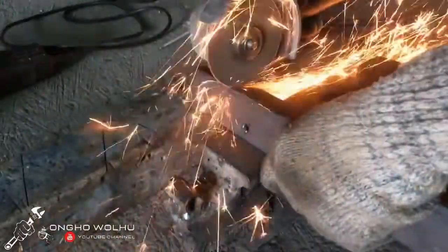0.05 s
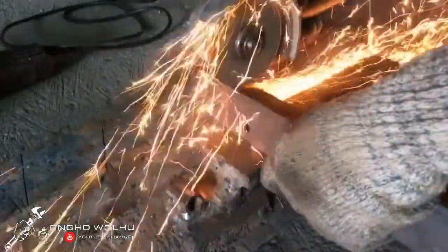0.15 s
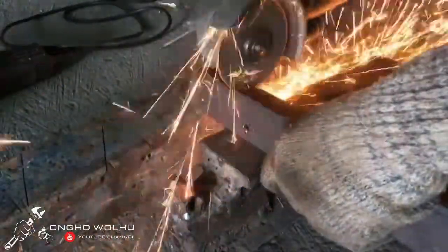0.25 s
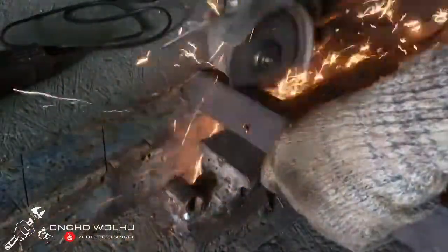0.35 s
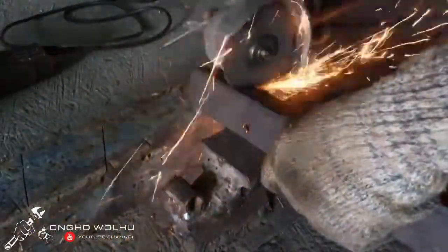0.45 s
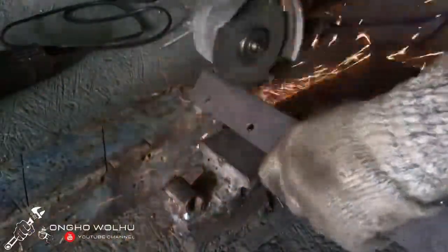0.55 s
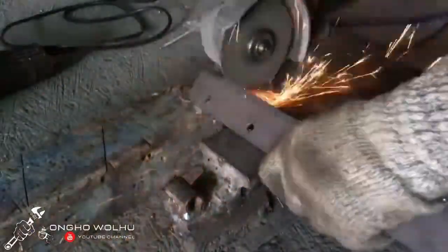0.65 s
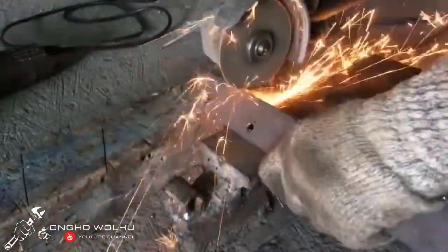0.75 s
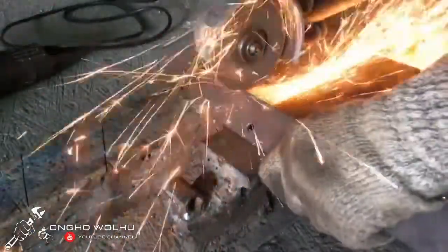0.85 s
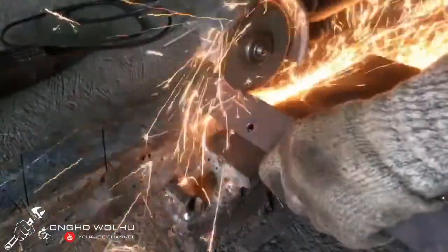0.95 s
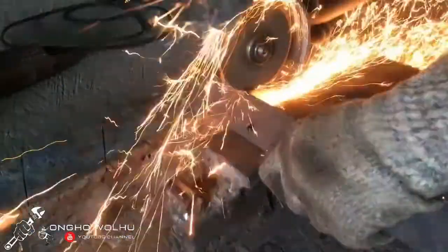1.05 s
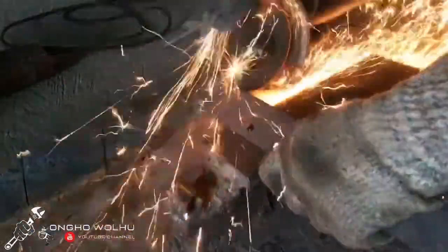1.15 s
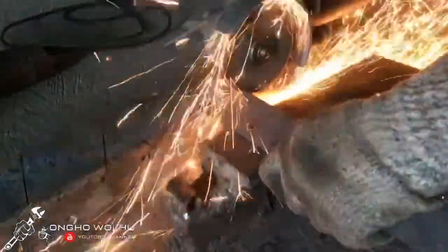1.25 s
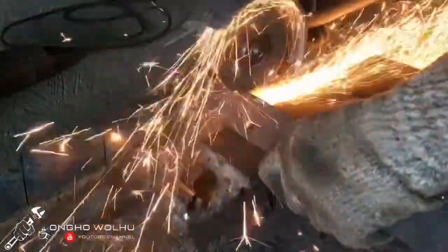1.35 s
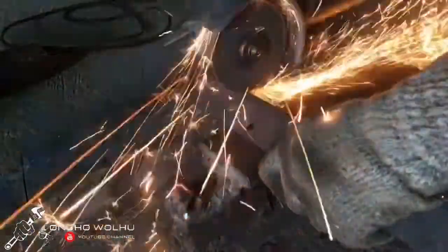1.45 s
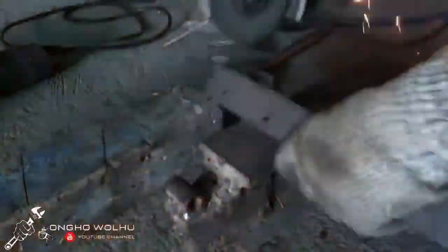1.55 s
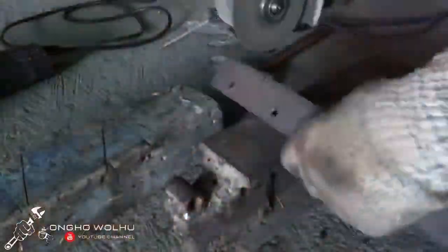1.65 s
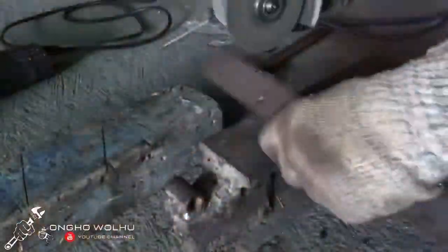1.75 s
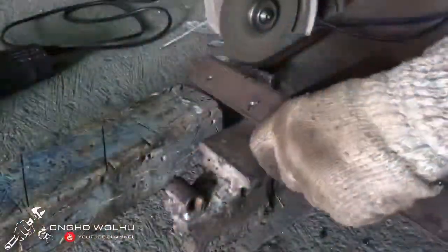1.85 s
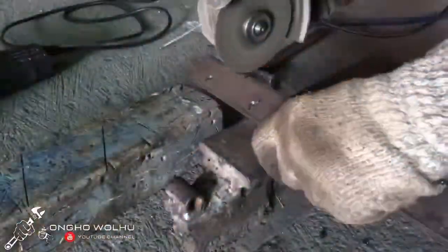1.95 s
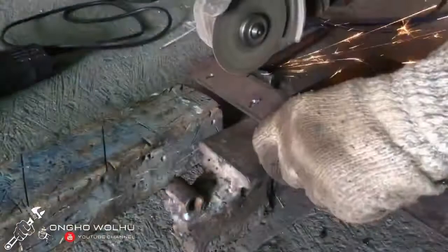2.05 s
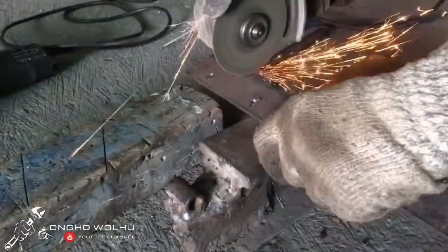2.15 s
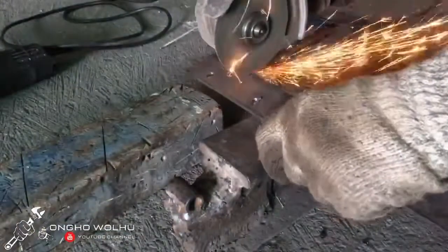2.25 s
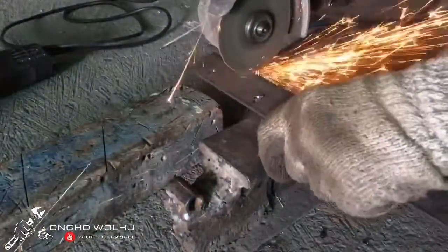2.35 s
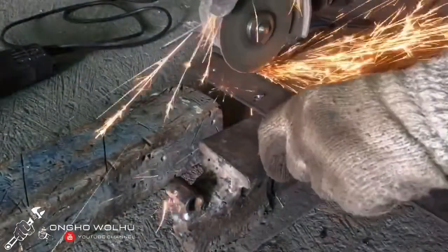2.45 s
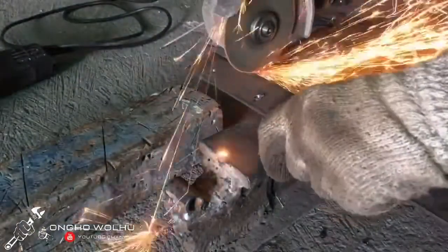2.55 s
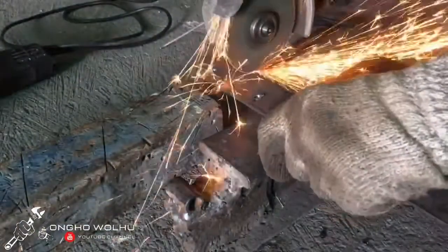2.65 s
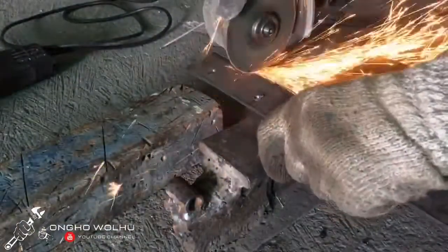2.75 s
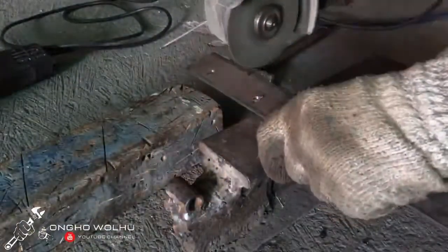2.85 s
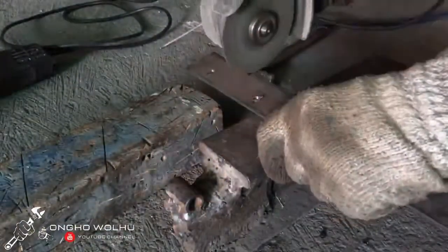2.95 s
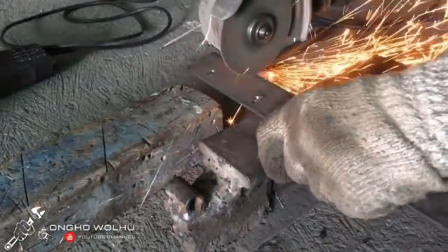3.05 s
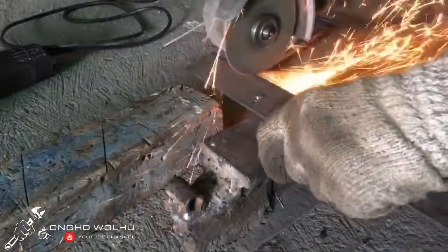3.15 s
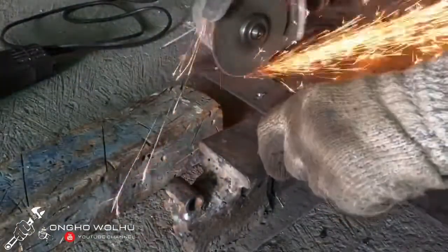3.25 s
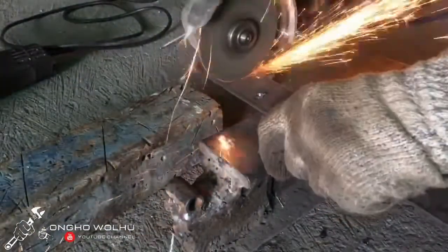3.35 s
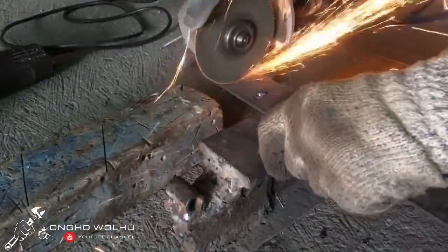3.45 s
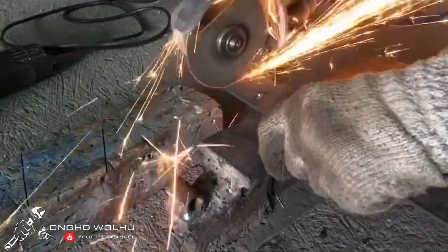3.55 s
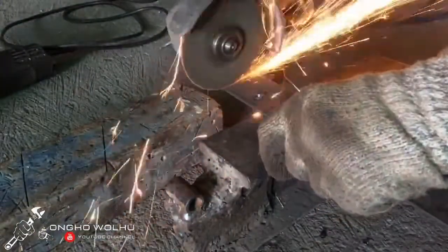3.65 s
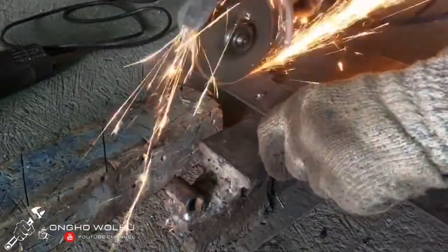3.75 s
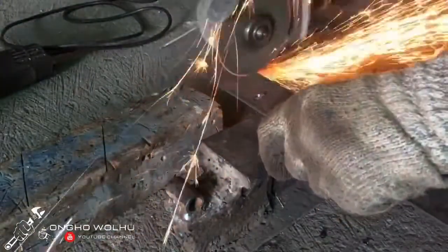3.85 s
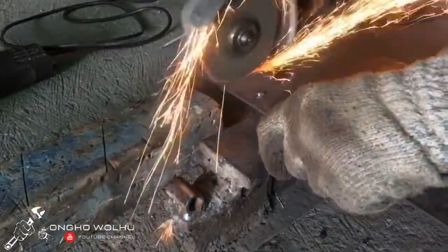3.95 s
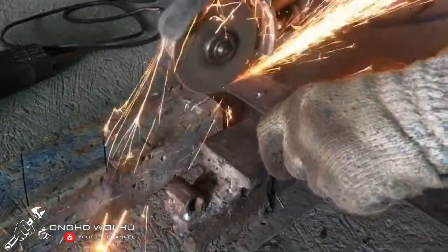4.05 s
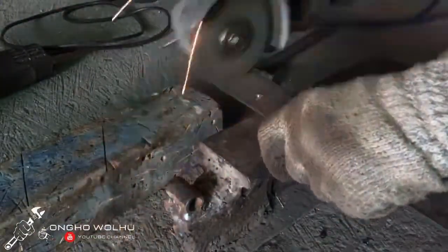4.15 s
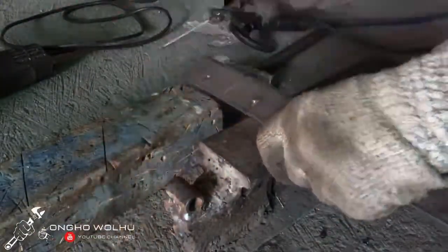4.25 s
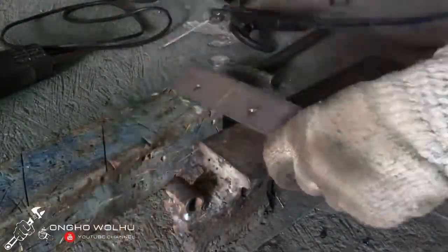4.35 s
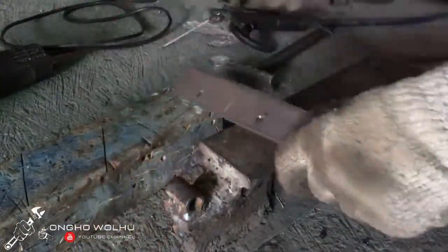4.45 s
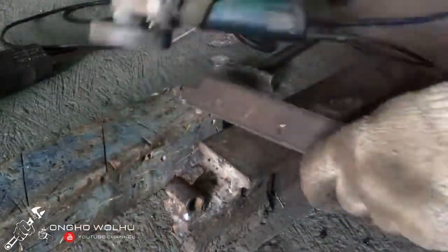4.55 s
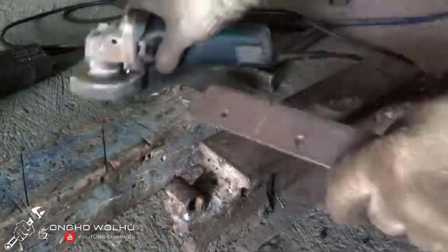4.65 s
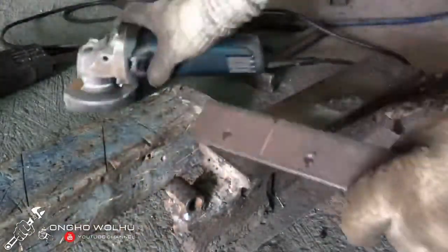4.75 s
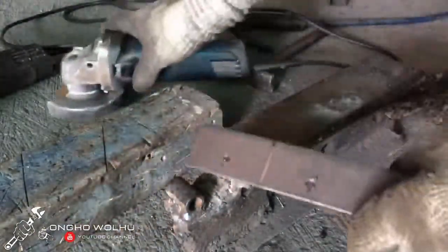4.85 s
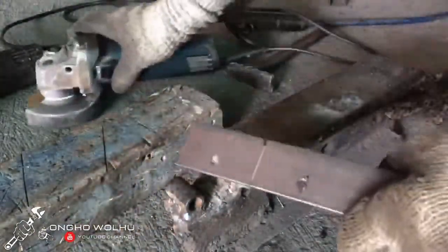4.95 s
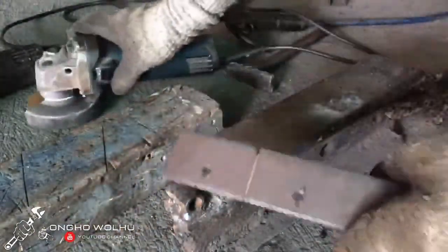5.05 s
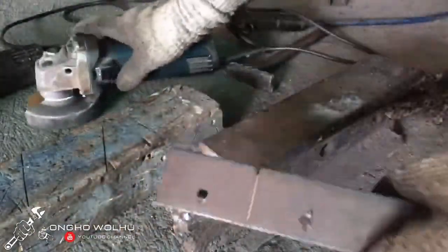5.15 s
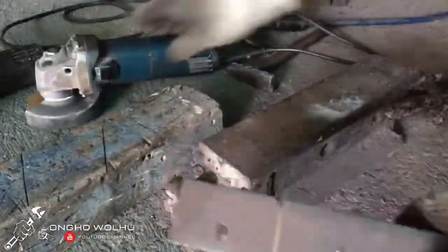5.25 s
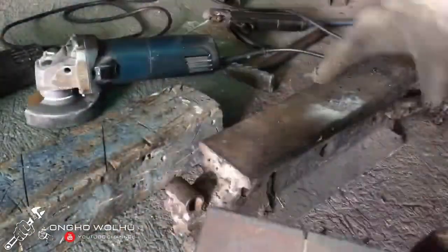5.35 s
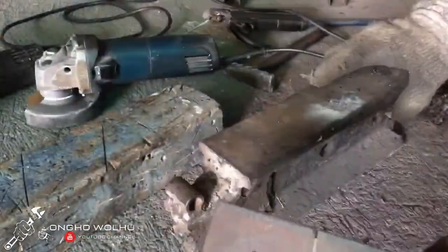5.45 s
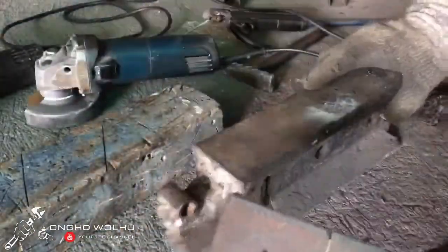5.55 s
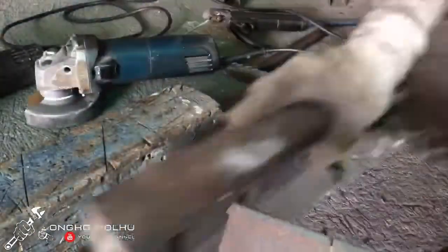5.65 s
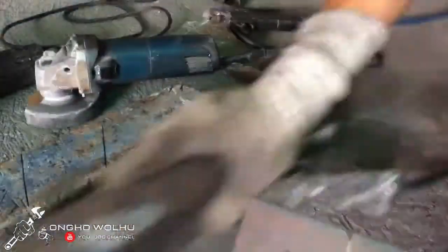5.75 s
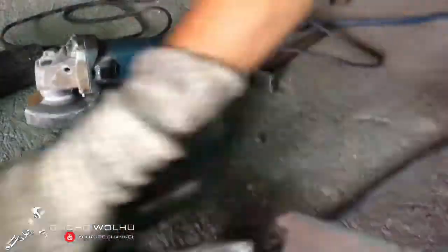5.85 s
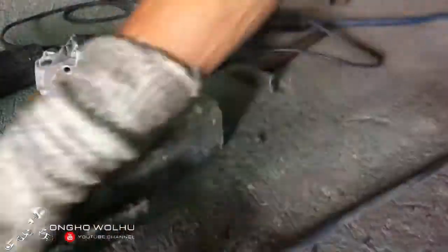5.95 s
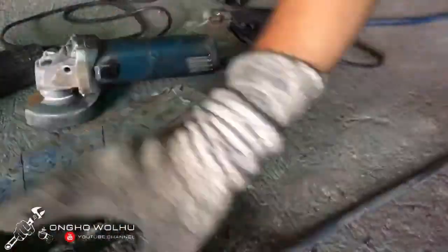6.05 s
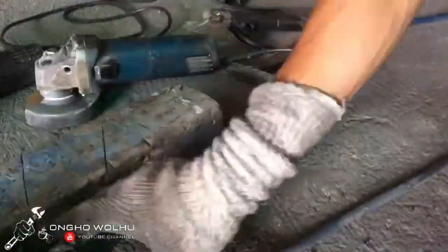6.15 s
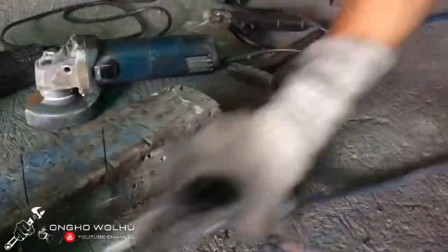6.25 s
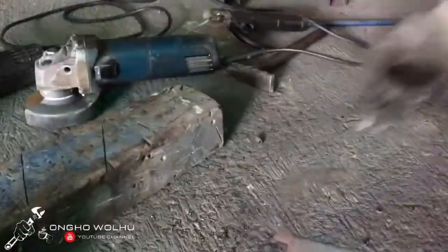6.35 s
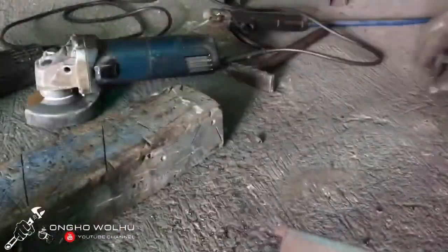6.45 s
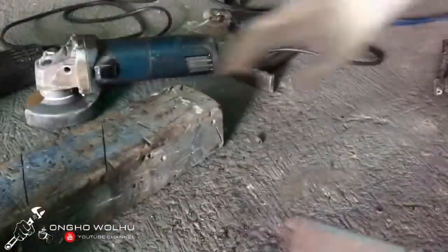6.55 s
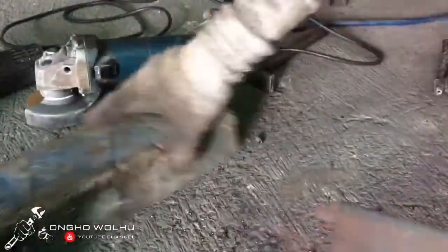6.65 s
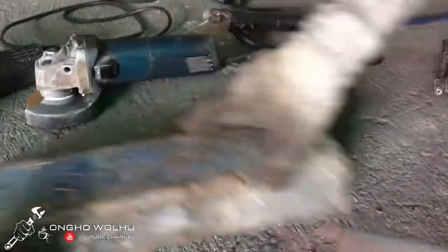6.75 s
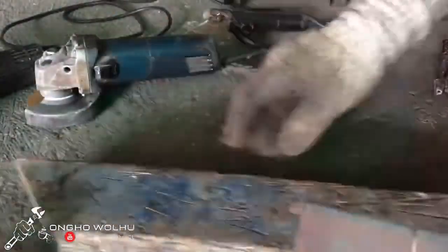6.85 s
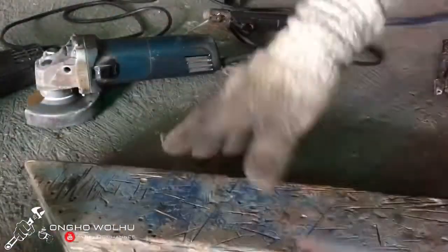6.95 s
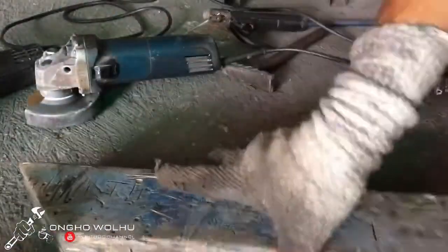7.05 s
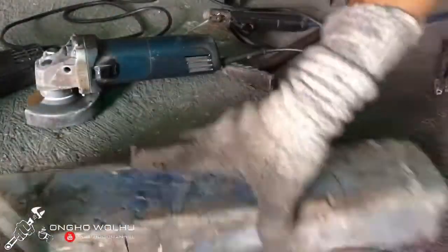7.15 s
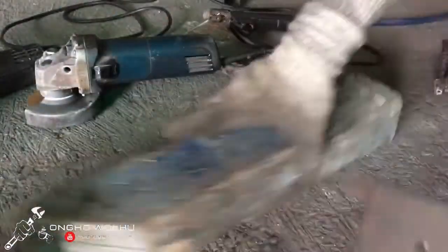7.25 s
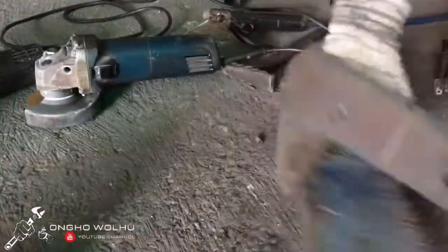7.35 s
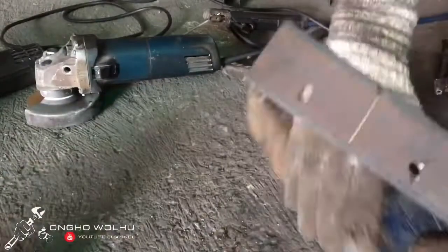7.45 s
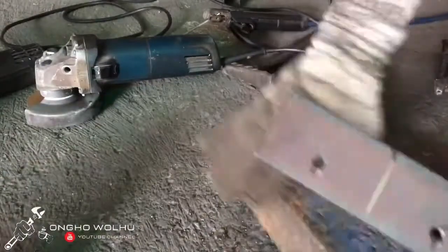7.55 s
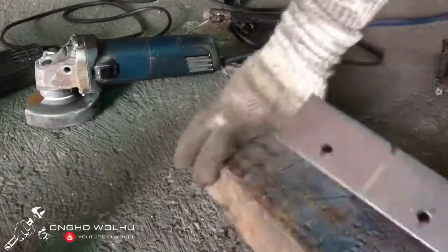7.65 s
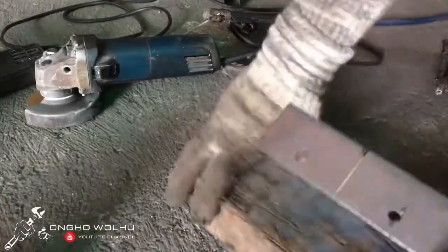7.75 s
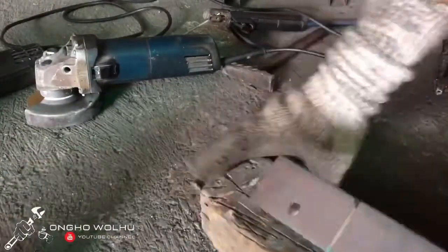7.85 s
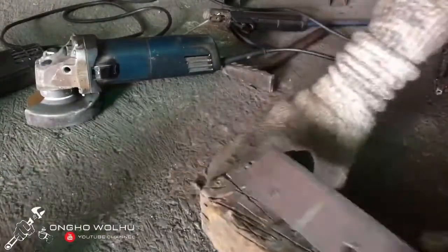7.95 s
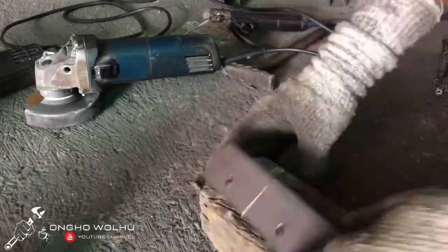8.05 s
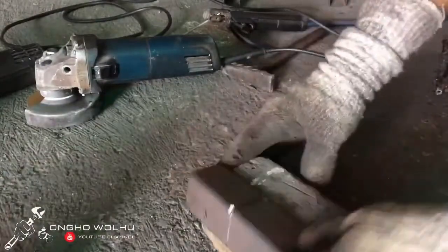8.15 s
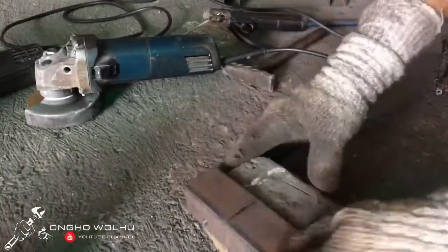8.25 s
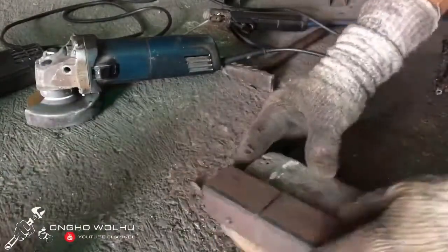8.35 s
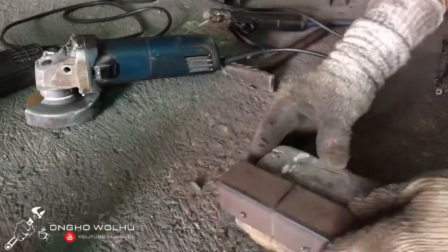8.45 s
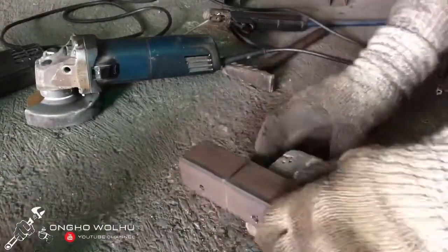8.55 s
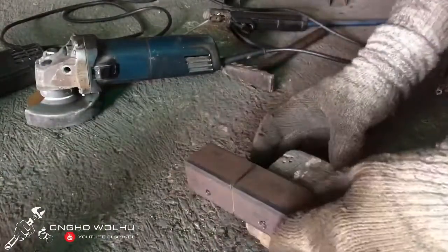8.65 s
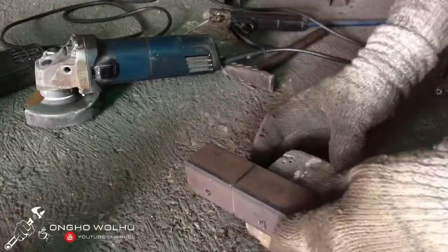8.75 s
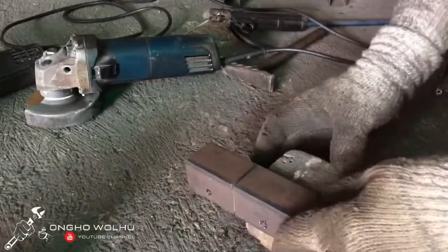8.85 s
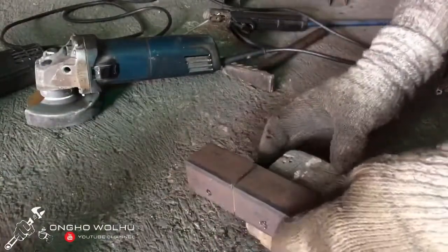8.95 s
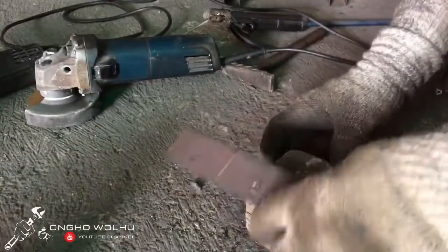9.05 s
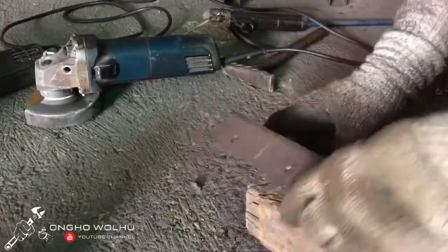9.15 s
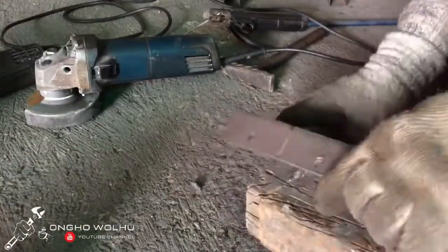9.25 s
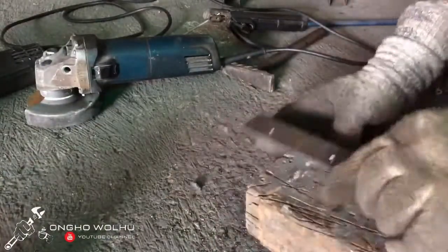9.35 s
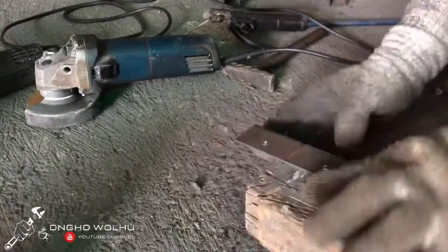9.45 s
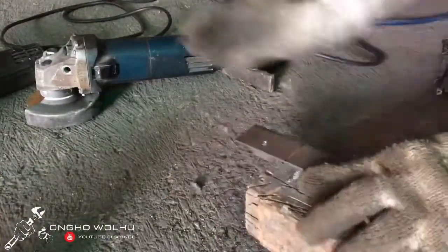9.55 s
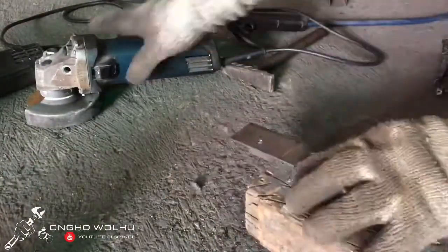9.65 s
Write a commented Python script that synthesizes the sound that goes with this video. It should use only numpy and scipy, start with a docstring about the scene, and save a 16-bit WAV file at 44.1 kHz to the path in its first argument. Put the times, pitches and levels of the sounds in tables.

```python
"""A harsh, buzzing screech and a hiss of sparks: an angle grinder cuts a steel angle bar on a wooden block
on concrete. It lifts off twice, is switched off and coasts down in pitch. Then a steel piece and the block are
dragged over the floor and the bar is knocked onto the block. Noise through resonances makes cut, roar and
drags; summed sines make motor tones, ticks and bumps; knocks mix both. Floor shaking booms through the stand."""
import sys
import numpy as np
from scipy import signal
from scipy.fft import rfft, irfft, next_fast_len
from scipy.io import wavfile
from scipy.ndimage import uniform_filter1d, map_coordinates

SR = 44100
rng = np.random.default_rng(int(sys.argv[2]) if len(sys.argv) > 2 else 0)


def master_out(mix):
    """Clip the mix to full scale and print it as 16-bit PCM to the path in sys.argv[1]."""
    frames = np.transpose(np.atleast_2d(mix))
    ceiling = np.clip(frames, -1, 1)
    pcm = np.round(ceiling * 32767).astype(np.int16)
    wavfile.write(sys.argv[1], SR, pcm)


N = 427769
# frequency and time grid of the time-varying filters
HZ, T, _ = signal.stft(np.zeros(N), SR, nperseg=1024)
HZ = HZ[:, None]
CONTACT_S = .0018  # time constant with which knocks and ticks rise

# passes of the disc: start t/s, end t/s, screech level/dB, sparks level/dB, boom level/dB,
# pressure change over the pass/dB, brightest sparks f/Hz
CUT_PASSES = [(0, 0.488, -19, -23.5, -23.5, -3, 7900), (0.494, 0.657, -27, -26.5, -49, -2.5, 9300),
              (0.638, 1.443, -22.5, -22, -24.5, 0, 6500), (1.994, 2.046, -32, -22.5, -32, 2.5, 9500),
              (2.107, 2.738, -24, -24, -35.5, -0.5, 9300), (2.978, 4.121, -23, -22, -32, 0, 7900)]
# relative spectrum of the spark hiss: f/Hz, density level/dB per Hz
SPARK_SPECTRUM = [(2650, -15.5), (4500, -7), (6140, -18), (6720, -6), (7390, -11.5), (8040, -5.5),
                  (9570, -9), (12400, -11), (13300, -3), (13900, -8.5)]
# resonances of floor and microphone stand, before an exponent sharpens them: f/Hz, width/Hz, level/dB
STAND_RINGS = [(111, 168, -13), (218.6, 78, -5.5), (353.8, 24.8, -1.5), (459.6, 67, -6.5)]
SCREECH_PRESS, SPARKS_PRESS, BOOM_PRESS = 0.47, -0.77, 3  # level change, dB per dB of pressure
BITE_DB, BITE_S = 1.5, 0.023  # extra screech and sparks as the rim first bites; its decay constant
TOUCH_S, LIFT_DB_PER_S, BOOM_RISE_S = 0.0024, 910, 0.096
GLOW_WIDTH_HZ, GLOW_DB = 2900, 5  # the brightest part of the spark hiss
BUZZ = .4  # share by which the high spot of the rim swells the sparks once a turn


def cut(turns):
    """Forced vibration: periodic grit and random tearing ring the bar, throw sparks and shake the floor."""
    start, end, screech_db, sparks_db, boom_db, press_db, glow_hz = np.transpose(CUT_PASSES)

    def level(db, press, bite_db, rise_s=TOUCH_S):
        def level_db(since, done):
            pressure = press * press_db[:, None] * done
            return db[:, None] + pressure + bite_db * np.exp(-since / BITE_S)
        return strokes(start, end, level_db, rise_s, LIFT_DB_PER_S)

    turn_phase = 2 * np.pi * turns
    runout = 1 + 0.045 * np.sin(turn_phase + wobble(5.8))  # an out-of-round disc presses once a turn
    high_spot = 1 + BUZZ * np.sin(turn_phase + .4 * wobble(20))
    hand_db = .6 * wobble(9)  # the hand's pressure is never even
    chatter = amp(wobble(25.05) + 1.3 * wobble(90))

    def tearing():
        return unit(chatter * runout * rng.standard_normal(N))

    torn = unit(shaped(tearing(), bar(HZ, T) ** 1.05, patchy_db=2))
    screech = amp(1.5 * wobble(70)) * (.78 * np.sqrt(chatter) * rim(turns) + .63 * torn)

    glow_now = np.interp(T, (start + end) / 2, glow_hz)
    glow = 0.5 + rings([(glow_now, GLOW_WIDTH_HZ, GLOW_DB)], HZ)
    showers = tearing() * high_spot * amp(1.43 * wobble(500))
    sparks = shaped(showers, amp(along(SPARK_SPECTRUM, HZ)) * glow, patchy_db=3)

    boom = unit(shaped(tearing(), rings(STAND_RINGS, HZ) ** 3.1))
    boom = boom + 0.15 * amp(2.3 * wobble(9.8)) * np.sin(turn_phase)
    return (level(screech_db, SCREECH_PRESS, BITE_DB) * amp(hand_db) * screech
            + level(sparks_db, SPARKS_PRESS, BITE_DB) * amp(0.49 * wobble(7.2)) * unit(sparks)
            + level(boom_db, BOOM_PRESS, 0, BOOM_RISE_S) * amp(hand_db + 0.33 * wobble(11)) * boom)


# multiples of the disc speed that the rim's wear favours: multiple, extra level/dB
WORN_ORDERS = [(17, 3), (18, 4), (21, 3), (23, 2), (25, 1), (27, 2)]
# strength of the squeal against the tearing: t/s, level/dB
SQUEAL_LEVEL = [(0, -4), (.6, -1), (1.45, 0), (2.1, 2), (2.75, 3), (3.3, -1), (4.15, 1)]


def rim(turns):
    """Periodic excitation: the same grit passes each turn, so the bar squeals on multiples of the disc speed."""
    t = np.arange(N) / SR
    speed = np.interp(T, t, np.gradient(turns) * SR)
    out = np.zeros(N)
    for order in range(16, 34):
        answer = np.interp(t, T, bar(order * speed, T) ** 1.9)
        order_db = dict(WORN_ORDERS).get(order, 0) + 2.2 * wobble(9) + 2 * wobble(45)
        phase = 2 * np.pi * (order * turns + rng.random()) + .25 * wobble(35)
        out += answer * amp(order_db) * np.sin(phase)
    return amp(curves(SQUEAL_LEVEL, t)[0]) * unit(out)


# steady rings of bar and disc: f/Hz, width/Hz, level/dB
STEADY_RINGS = [(1380, 170, -5), (1930, 540, -5)]
# rings of the overhanging end: f/Hz, width/Hz, level/dB
FREE_END_RINGS = [(3970, 160, -0.5), (4560, 460, -8)]
# main squeal rings, gliding as the disc slows and recovers: t/s, lower f/Hz, upper f/Hz,
# upper level/dB and free-end level/dB against the lower
SQUEAL_RINGS = [(0, 2050, 2900, -5, -5), (.35, 2200, 3050, -5, 0), (.65, 2230, 3030, 2, -8),
                (.9, 2200, 3050, -2, -1), (1.1, 2300, 3150, -1, -6), (1.45, 2300, 3120, 1, -10),
                (2.1, 2460, 2900, -2, -14), (3, 2470, 2930, -1, -14), (3.6, 2200, 2950, -3, -13),
                (4.15, 2150, 2980, 3, -14)]


def bar(hz, t):
    """Resonance: gain at frequencies hz and times t of steady rings, gliding squeal rings and free-end rings."""
    lower, upper, upper_db, end_db = curves(SQUEAL_RINGS, t)
    squeal = [(lower, 220, 0), (upper, 300, upper_db)]
    free_end = [(f, width, db + end_db) for f, width, db in FREE_END_RINGS]
    return rings(STEADY_RINGS + squeal + free_end, hz)


# brief thin rings of the bar: centre of span less half its length t/s, length t/s, f/Hz, level/dB
BAR_WHISTLES = [(3.5, .2, 3400, -31), (3.7, .12, 5490, -38), (4.0, .12, 4800, -37), (5.75, .02, 8750, -38),
                (5.775, .09, 1400, -36)]


def whistles():
    """Single-mode ringing: now and then one high mode of the bar sings for a moment."""
    t = np.arange(N) / SR
    out = np.zeros(N)
    for s, length, hz, db in BAR_WHISTLES:
        half = length / 2
        swell = np.exp(-((t - s - half) / half) ** 4)
        out += amp(db + 3.9 * wobble(56)) * swell * np.sin(2 * np.pi * hz * t + 0.46 * wobble(30))
    return out


# disc speed up to the coast: slowed by the cut, recovering in the air, then a sudden drop:
# t/s, speed/turns per s
DISC_SPEED = [(0, 120), (.29, 111.6), (.47, 115.2), (.63, 125), (.72, 127), (.856, 121.7), (1.03, 108.8),
              (1.15, 103.3), (1.35, 97.2), (1.45, 97), (1.6, 118), (1.85, 134), (2.1, 137), (2.75, 135.5),
              (3.05, 139), (3.29, 132.4), (3.51, 127.7), (3.72, 124.1), (4.12, 123), (4.44, 138),
              (4.5, 121.4)]
OFF_S, COAST_S, RUB_TURNS = 4.5, 2.66, 25  # switch-off; air drag time; bearing friction as turns per s


def disc_turns():
    """Rotational decay: turns made up to each sample; off, the disc loses speed to air and bearings."""
    t = np.arange(N) / SR
    coast = (DISC_SPEED[-1][1] + RUB_TURNS) * np.exp(-(t - OFF_S) / COAST_S) - RUB_TURNS
    speed = np.where(t < OFF_S, curves(DISC_SPEED, t)[0], np.maximum(coast, .1))
    return np.cumsum(speed) / SR


# relative spectrum of the fan and gear roar: f/Hz, density level/dB per Hz
FAN_SPECTRUM = [(60, -35), (250, -9.5), (350, -5.5), (520, -4.5), (730, 4), (1100, -4.5), (1480, -5),
                (1900, -7), (3100, -8), (4200, -14.5), (5100, -12), (6200, -15.5), (8000, -14),
                (10000, -20), (13900, -24)]
# steady rings in the motor's roar: f/Hz, width/Hz, level/dB
CASING_RINGS = [(740, 34, -15), (1443, 64, 4), (10130, 350, 2)]
# ring of the casing once it lies on the floor: f/Hz, width/Hz, level/dB
LAID_RING = (660, 150, 0)
GEAR, FULL_TURNS = 3.6, 137  # armature turns per disc turn; unloaded disc speed, turns per s
ROAR_DB, ROAR_GROWS = -24, 1.557  # at full speed; dB per dB of speed
TREBLE_DB, TREBLE_GROWS = 2.5, 0.24  # tilt reached at 4 kHz, full speed; dB per dB of speed
TONE_DB, COAST_TONE_DB, COAST_GROWS = -43, -27.5, 1.97  # driven; coasting at full speed; dB per dB of speed
SWELL_S = 0.2  # time constant with which the tone stands out once the drive is off
TONE_SINKS_S, TONE_SINKS_DB = (5.55, 5.9), -9  # the coasting tone drops back over this span
OCTAVE_DB, COAST_OCTAVE_DB, OCTAVE_RISE_S, OCTAVE_FADES = -40, 10, .12, 24  # on; gain once off; s; dB per s
WHINE_MULTIPLE, WHINE_DB, WHINE_T60 = 12, -42, 2.5  # of the armature speed; at switch-off; s
AWAY_S, AWAY_DB = (4.12, 4.2, 4.5, 4.75), -2  # swung away from the bar, then laid on the floor nearby


def motor(turns):
    """Speed-dependent radiation: roar sinks and dulls as it slows, over armature tone, octave and brief whine."""
    t = np.arange(N) / SR
    speed_db = 20 * np.log10(np.gradient(turns) * SR / FULL_TURNS)
    off = np.maximum(t - OFF_S, 0)  # seconds since switch-off

    treble_db = TREBLE_DB + TREBLE_GROWS * np.interp(T, t, speed_db)
    tilt_db = treble_db * np.clip(np.log2((HZ + 1) / 1000), 0, 2) / 2
    laid = np.interp(T, AWAY_S[2:], [0, 1]) * rings([LAID_RING], HZ)
    casing = 1 + rings(CASING_RINGS, HZ) + laid
    roar = shaped(rng.standard_normal(N), amp(along(FAN_SPECTRUM, HZ) + tilt_db) * casing, patchy_db=1.5)
    away_db = np.interp(t, AWAY_S, [0, AWAY_DB, AWAY_DB, 0])
    roar_db = ROAR_DB + away_db + ROAR_GROWS * speed_db + 0.17 * wobble(9.1) + 1.05 * wobble(60)

    phase = 2 * np.pi * GEAR * turns + 0.22 * wobble(40)
    swell = 1 - np.exp(-off / SWELL_S)
    sink_db = np.interp(t, TONE_SINKS_S, [0, TONE_SINKS_DB])
    coast_tone = amp(COAST_TONE_DB + COAST_GROWS * speed_db + sink_db)
    tone = (1 - swell) * amp(TONE_DB) + swell * coast_tone
    tones = tone * amp(1.8 * wobble(20)) * np.sin(phase)

    octave_db = OCTAVE_DB + COAST_OCTAVE_DB * np.clip(off / OCTAVE_RISE_S, 0, 1) - OCTAVE_FADES * off
    tones += amp(octave_db + 3 * wobble(6.8)) * np.sin(2 * phase + 0.48 * wobble(30))
    tones += (off > 0) * amp(WHINE_DB - 60 * off / WHINE_T60) * np.sin(WHINE_MULTIPLE * phase)
    return amp(roar_db) * roar + np.sqrt(2) * tones


# thin high ticks while the disc coasts on the floor: t/s, level/dB
COAST_TICKS = [(5.0867, -29), (5.1158, -27.5), (5.2336, -28), (5.3019, -30), (5.3333, -35), (5.3967, -31),
               (5.4117, -27), (5.4486, -33)]
# modes of a tick: f/Hz, level/dB, t60/s
TICK_MODES = [(8020, 5.5, 0.022), (2930, -1.5, .02)]


def ticks():
    """Impulse response: each tick rings two small damped modes for a moment."""
    out, t = np.zeros(N), np.arange(SR // 20) / SR
    ring = sum(amp(db - 60 * t / t60) * np.sin(2 * np.pi * hz * t) for hz, db, t60 in TICK_MODES)
    ring = ring * (1 - np.exp(-t / CONTACT_S))
    for s, db in COAST_TICKS:
        out[round(s * SR):][:len(t)] += amp(db) * ring
    return out


# knocks: t/s, level/dB, wood pitch f/Hz, wood rattle t60/s, steel ring level/dB, treble level/dB,
# favoured steel mode f/Hz
BLOCK_KNOCKS = [(6.289, -19, 997, 0.11, -30, -6, 2190), (6.717, -11, 1535, 0.057, -19, -6, 2794),
                (6.752, -17, 1260, 0.13, -34, -12, 2190), (6.773, -21.5, 1580, 0.097, -31, -6, 2190),
                (7.125, -28, 1580, 0.056, -24, -2, 2794), (7.155, -32, 1540, 0.066, -25, 6, 2794),
                (7.274, -30, 1270, 0.12, -25, 0, 2794), (7.336, -17.5, 1290, 0.13, -29, -3, 2340),
                (7.387, -18.5, 1460, 0.08, -19, -4, 3413), (7.414, -19.5, 1273, 0.14, -23, -4, 3413),
                (7.45, -25, 1550, .05, -26, -2, 3413), (7.48, -28.5, 1580, 0.099, -30, -10, 2794),
                (7.78, -11.5, 1800, 0.048, -33, -30.5, 2190), (7.791, -13.5, 1750, 0.099, -26, -26.5, 2190),
                (8.094, -28, 1300, .05, -20, -30, 2019), (8.101, -14, 1299, 0.29, 0, -34, 2019),
                (8.166, -14, 1215, 0.06, -25.5, -34, 2019), (8.344, -0.5, 1733, 0.095, -28.5, -27.5, 2190),
                (8.361, -10.5, 1800, 0.18, -30, -27, 2190), (8.41, -18.5, 1743, 0.2, -27.5, -17, 2190),
                (8.525, -32, 1710, 0.16, -22, -11.5, 3844), (8.991, -44, 1590, 0.1, -8, -14, 5670),
                (9.036, -47.5, 1790, 0.071, 5.5, -23, 2190), (9.143, -22.5, 1220, 0.042, -14.5, -26, 680),
                (9.269, -31.5, 1574, 0.29, 1, -31, 2190), (9.367, -21.5, 1656, 0.09, -9.5, -29.5, 680),
                (9.406, -23.5, 1395, 0.25, -7, -31, 2794), (9.647, -46, 1400, 0.24, -11, -6, 2190)]
# modes of the bar before each blow varies them: f/Hz, level/dB, t60/s
STEEL_MODES = [(680, -1, .2), (985, -5, .2), (1270, -4, .12), (1712, -4, .3), (1798, -7, .16),
               (2019, -6, .2), (2190, -3, .24), (2340, -8, .2), (2794, -8, .12), (3413, -8, .13),
               (3844, -16, .13), (4059, -15, .2), (4256, -12, .13), (5670, -20, .25), (6928, -21, .11)]
CRACK_T60 = 0.075  # added damping: a knock's treble dies sooner than its body, s
FREE_S, HELD_T60 = .11, .2  # the bar rings freely, then the glove adds this damping, s
FAVOUR_DB = 7  # where a blow lands favours one mode of the bar


def band(x, order, low_hz, high_hz):
    """Band-pass filtering: keeps the range between two corner frequencies, at rms 1."""
    sos = signal.butter(order, [low_hz, high_hz], "band", fs=SR, output="sos")
    return unit(signal.sosfilt(sos, x))


def knocks():
    """Impact excitation: a rattling burst around the wood's own note, a crack, and the bar's damped modes."""
    out, t = np.zeros(N + SR), np.arange(SR // 2) / SR
    for s, db, hz, t60, steel_db, treble_db, mode_hz in BLOCK_KNOCKS:
        noise = rng.standard_normal((3, len(t)))
        rattle = amp(2 * unit(uniform_filter1d(noise[2], 130)) - 60 * t / max(t60, .01))
        wood = band(noise[0], 3, 0.45 * hz, 1.24 * hz)
        drift = .9 * unit(uniform_filter1d(noise[2], 200))
        note = 1.2 * amp(-70 * t / max(t60, .01)) * np.sin(2 * np.pi * hz * t + drift)
        crack = amp(treble_db - 60 * t / CRACK_T60) * band(noise[1], 1, 2500, 8000)

        ring, waver = np.zeros(len(t)), .35 * unit(uniform_filter1d(noise[0], 300))
        for f, mode_db, mode_t60 in STEEL_MODES:
            blow_db = rng.normal(0, 3) + FAVOUR_DB * (abs(f / mode_hz - 1) < .05)
            ring += amp(mode_db + blow_db - 60 * t / mode_t60) * np.sin(2 * np.pi * f * t + waver)
        held = amp(steel_db - 60 * np.maximum(t - FREE_S, 0) / HELD_T60)

        attack = amp(db - 9.5) * (1 - np.exp(-t / CONTACT_S))
        out[round(s * SR):][:len(t)] += attack * (rattle * (wood + crack) + note + held * ring)
    return out[:N]


# drags and slides over the floor: start t/s, end t/s, boom level/dB, scrape level/dB
FLOOR_DRAGS = [(5.554, 5.866, -17.5, -37.5), (6.179, 6.439, -30, -41), (6.656, 6.843, -27.5, -45),
               (7.061, 7.525, -34.5, -44.5), (7.57, 7.676, -42, -47.5), (7.693, 7.83, -38.5, -46.5),
               (8.077, 8.176, -36, -60), (8.315, 8.44, -30.5, -44.5), (8.485, 8.562, -45, -52),
               (8.985, 9.051, -40, -58.5), (9.136, 9.154, -30, -57), (9.196, 9.303, -39, -55.5),
               (9.348, 9.437, -32.5, -63)]
# relative spectrum of the scrape: f/Hz, density level/dB per Hz
GRIT_SPECTRUM = [(350, -31.5), (700, 1), (1400, -6.5), (2000, -14), (3200, -18.5), (5000, -23), (9000, -20),
                 (13900, -24)]
GRIP_S, BOOM_DB_PER_S, SCRAPE_DB_PER_S = 0.026, 442, 253.5  # rise; fall after the end


def drag():
    """Stick-slip friction: undersides catch on concrete in uneven slips, a lumpy boom and a gritty scrape."""
    start, end, boom_db, scrape_db = np.transpose(FLOOR_DRAGS)

    def level(db, fall):
        return strokes(start, end, lambda since, done: db[:, None] + 0 * since, GRIP_S, fall)

    slips_db = 2.4 * wobble(45)
    shaking = unit(amp(slips_db) * rng.standard_normal(N))
    boom = shaped(shaking, rings(STAND_RINGS, HZ) ** 1.4)
    rasp = unit(amp(slips_db / 2 + 3.5 * wobble(200)) * rng.standard_normal(N))
    scrape = shaped(rasp, amp(along(GRIT_SPECTRUM, HZ)), patchy_db=3.5)
    return level(boom_db, BOOM_DB_PER_S) * boom + level(scrape_db, SCRAPE_DB_PER_S) * scrape


# bumps felt through the floor: t/s, level/dB, pitch f/Hz
FLOOR_BUMPS = [(5.573, -17.5, 356), (5.608, -8.5, 327), (5.668, -5.5, 442), (5.712, -8.5, 446),
               (5.75, -9, 450), (5.828, 1, 445), (6.286, -18.5, 354), (6.337, -13, 360),
               (6.388, -12.5, 343), (6.67, -15.5, 470), (6.749, -8, 475), (6.771, -15, 466),
               (6.826, -17, 450), (7.144, -19.5, 343), (7.241, -20, 380), (7.286, -18.5, 390),
               (7.338, -15, 420), (7.386, -17, 363), (7.463, -19, 340), (7.556, -8.5, 353),
               (7.691, -20, 328), (7.725, -26, 340), (8.343, -11, 384), (8.402, -17.5, 405),
               (9.023, -25.5, 350), (9.146, -17.5, 413), (9.269, -15.5, 350), (9.41, -17.5, 336),
               (9.437, -15, 347)]


def bumps():
    """Structure-borne impulse: each bump rings the stand for a few cycles."""
    out, t = np.zeros(N + SR), np.arange(SR // 4) / SR
    for s, db, hz in FLOOR_BUMPS:
        phase = 2 * np.pi * hz * t
        ring = np.sin(phase) + 0.041 * np.sin(0.38 * phase)
        ring += 0.14 * amp(-60 * t / 0.039) * np.sin(0.48 * phase)
        out[round(s * SR):][:len(t)] += 1.4 * amp(db - 60 * t / 0.057) * (1 - np.exp(-t / 0.0016)) * ring
    return out[:N]


# reverberation of the workshop: f/Hz, t60/s
ROOM_DECAY = [(300, 0.045), (2000, 0.66), (10000, 0.26)]


def room(x):
    """Reverberation: each frequency of the workshop's answer dies at its own speed."""
    hz, t, z = signal.stft(rng.standard_normal(SR // 2), SR, nperseg=256)
    decay = amp(-60 * t / along(ROOM_DECAY, hz)[:, None])
    tail = signal.istft(z * decay, SR, nperseg=256)[1]
    delayed = np.pad(x, (300, 0))  # samples
    return signal.fftconvolve(delayed, tail / np.linalg.norm(tail))[:N]


# relative spectrum of the workshop's quiet floor: f/Hz, density level/dB per Hz
SHOP_SPECTRUM = [(15, -64), (25, -38), (46, -21), (70, -2.5), (237, -12.5), (371, -19.5), (510, -25.5),
                 (799, -31.5), (12800, -48.5), (13900, -61.5)]
SHOP_DB = -56.5


def shop_floor():
    """Background noise: a quiet, slightly uneven random rumble weighted to the bass."""
    noise = shaped(rng.standard_normal(N), amp(along(SHOP_SPECTRUM, HZ)), patchy_db=3.5)
    return amp(SHOP_DB + 0.95 * wobble(14.0)) * noise


def amp(db):
    """Decibel law: level to amplitude ratio."""
    return 10 ** (np.asarray(db) / 20)


def unit(x):
    """Normalisation: x at rms 1."""
    return x / np.sqrt(np.mean(x ** 2) + 1e-20)


def along(points, hz):
    """Logarithmic frequency scale: (f/Hz, value) points joined by lines on it."""
    f, v = np.transpose(points)
    return np.interp(np.log(hz + 1), np.log(f + 1), v)


def curves(rows, t):
    """Linear interpolation: the columns after the time, at times t."""
    s, *cols = np.transpose(rows)
    return [np.interp(t, s, c) for c in cols]


def wobble(rate):
    """Band-limited fluctuation: a smooth random curve, rate knots a second."""
    grid = np.arange(0, N / SR + .001, .0005)
    knots = rng.standard_normal(int(N * rate / SR) + 4)
    return np.interp(np.arange(N) / SR, grid, map_coordinates(knots, [grid * rate]))


def rings(modes, hz):
    """Modal superposition: gain at hz of (f/Hz, width/Hz, level/dB) resonances of alternating sign."""
    total = 0
    for k, (centre, width, db) in enumerate(modes):
        damping = 1j * hz * width
        total = total + (-1) ** k * amp(db) * damping / (centre * centre - hz * hz + damping + 1e-9)
    return np.abs(total)


def shaped(x, gain, patchy_db=0.):
    """Time-varying filtering with random patches of gain; rms 1 for white x of rms 1."""
    z = signal.stft(x, nperseg=1024)[2]
    field = uniform_filter1d(uniform_filter1d(rng.standard_normal(z.shape), 9, 0), 4, 1)
    gain = gain * amp(patchy_db * unit(field))
    return signal.istft(z * gain / np.sqrt(np.mean(gain ** 2, 0)), nperseg=1024)[1][:N]


def strokes(start, end, level_db, rise_s, fall_db_per_s):
    """Envelope: strokes rise, hold and fall; level_db(seconds in, share done) gives one row a stroke."""
    t = np.arange(0, N / SR, .001)
    since = np.maximum(t - start[:, None], 0)
    done = np.clip(since / (end - start)[:, None], 0, 1)
    rise = np.where(start[:, None] <= 0, 1, np.clip(since / rise_s, 0, 1))  # at 0 s already under way
    fall_db = fall_db_per_s * np.maximum(t - end[:, None], 0)
    gain = rise * amp(level_db(since, done) - fall_db)
    return np.interp(np.arange(N) / SR, t, gain.max(0))


KNOCK_ROOM_DB = -21  # knocks beside the microphone carry less of the workshop


def scene():
    """Superposition: airborne sounds with their reverberation, motor, floor sounds and background."""
    turns = disc_turns()
    air, near = cut(turns) + whistles() + ticks(), knocks()
    air = air + near + room(amp(-13) * air + amp(KNOCK_ROOM_DB) * near)
    return (air + motor(turns) + drag() + bumps() + shop_floor())[None]


DIP_HZ, DIP_WIDTH_HZ, DIP_DEPTH = 2650, 130, .62  # a narrow hollow in the whole sound; depth 0-1
# gain control: threshold; dB cut per dB above it; averaging time constant; recovery
KNEE_DB, SQUEEZE, SENSE_S, RECOVER_DB_PER_S = -24.5, 0.32, 0.0069, 16.5
TOP_HZ = 13800  # upper band limit


def record(dry):
    """Filtering and compression: thin bass, a narrow hollow, loud parts cut with slow recovery, a band limit."""
    m = next_fast_len(N + SR // 2)
    hz = np.fft.rfftfreq(m, 1 / SR)
    hollow = 1 - DIP_DEPTH * np.exp(-((hz - DIP_HZ) / DIP_WIDTH_HZ) ** 2)
    thin_bass = (1j * hz / (55 + 1j * hz)) ** 2
    x = irfft(rfft(dry, m) * hollow * thin_bass, m)[..., :N]

    keep = np.exp(-1 / (SENSE_S * SR))
    start = [[keep * np.mean(x[0, :SR // 10] ** 2)]]
    power = signal.lfilter([1 - keep], [1, -keep], x ** 2, zi=start)[0]
    loud_db = 10 * np.log10(power + 1e-12)
    # a running maximum on a rising ramp lets the cut jump up at once but fall only at the ramp's slope
    ramp = RECOVER_DB_PER_S * np.arange(N) / SR
    cut_db = np.maximum.accumulate(SQUEEZE * np.maximum(loud_db - KNEE_DB, 0) + ramp, axis=1) - ramp
    return irfft(rfft(x * amp(-cut_db), m) * (hz < TOP_HZ), m)[..., :N]


dry = scene()
out = record(dry)
master_out(out)
```